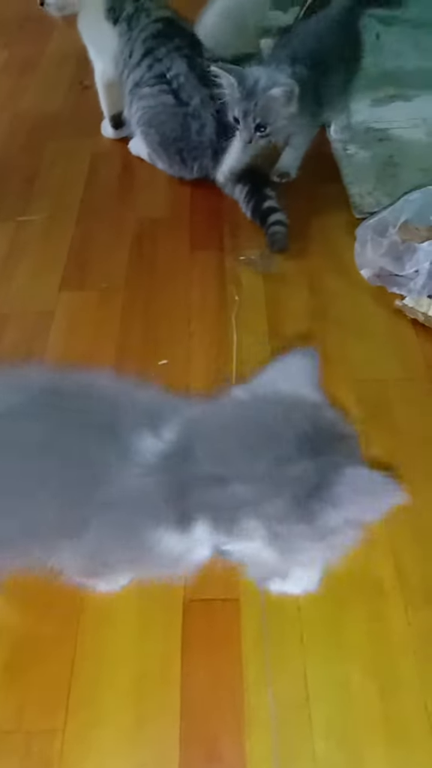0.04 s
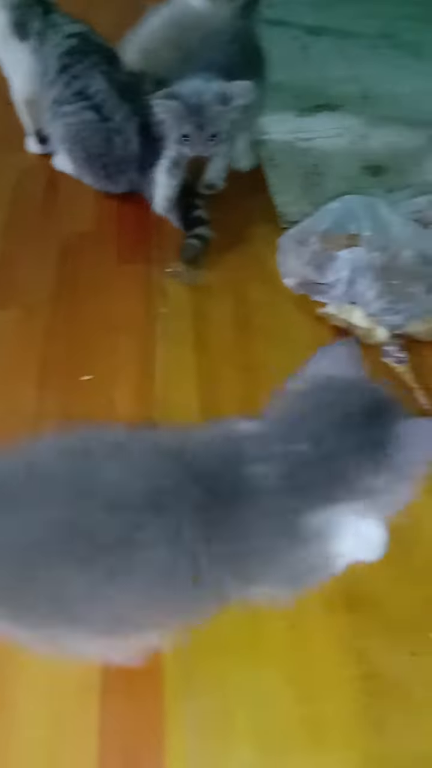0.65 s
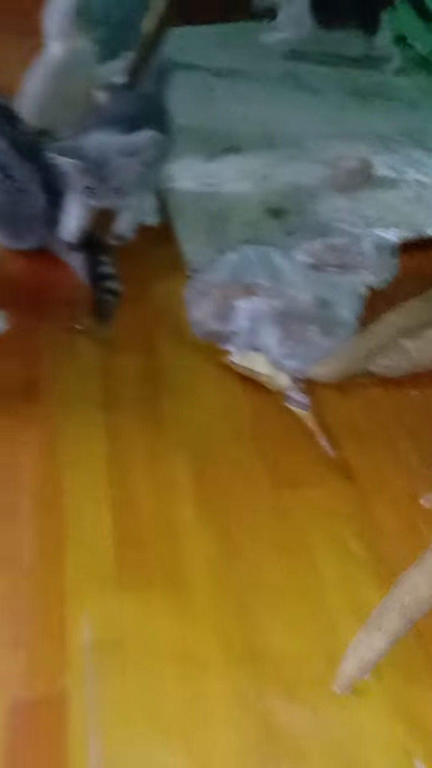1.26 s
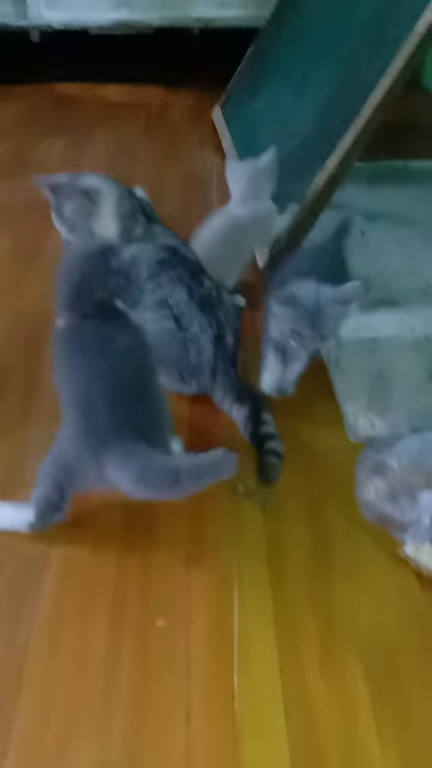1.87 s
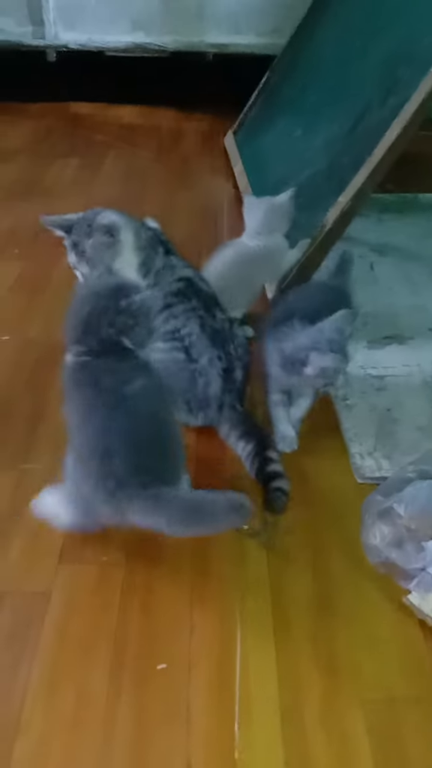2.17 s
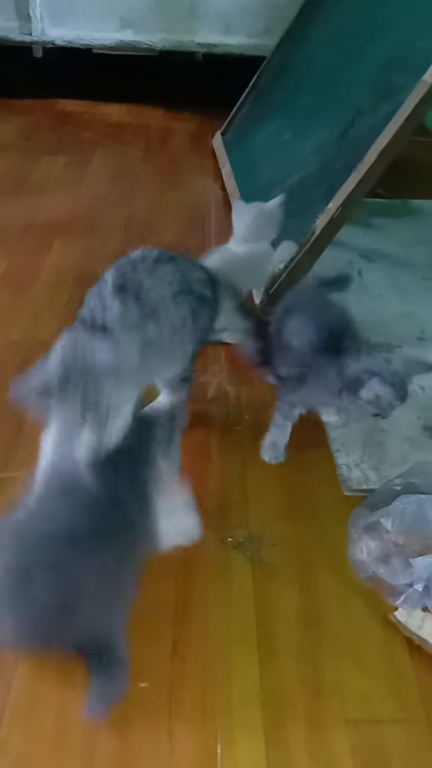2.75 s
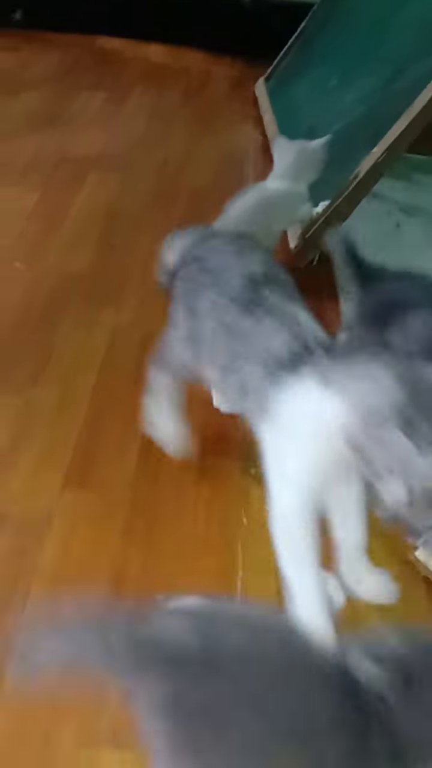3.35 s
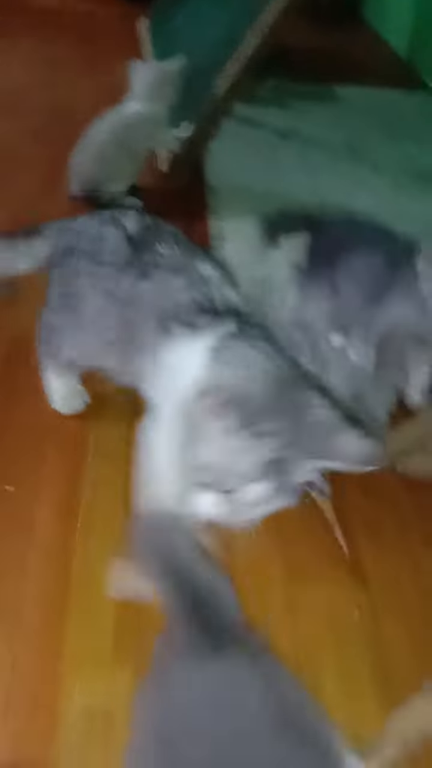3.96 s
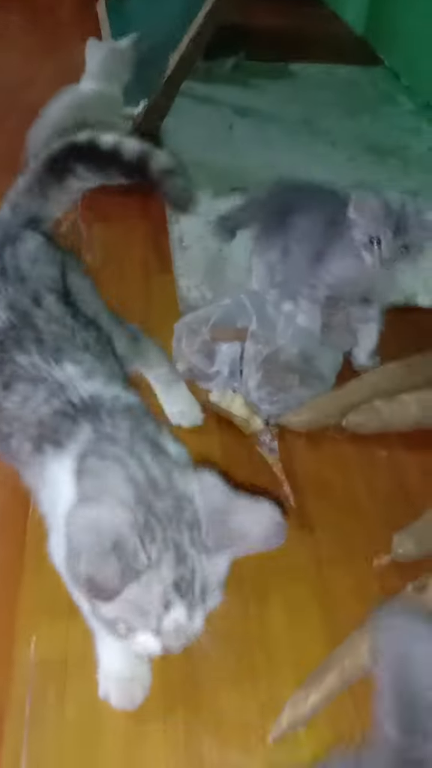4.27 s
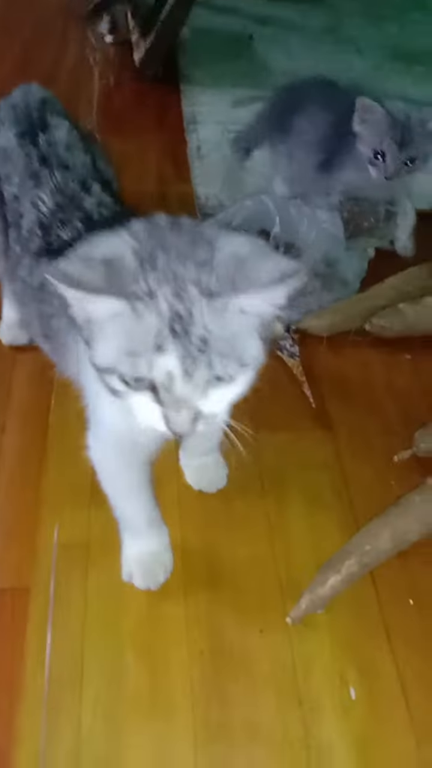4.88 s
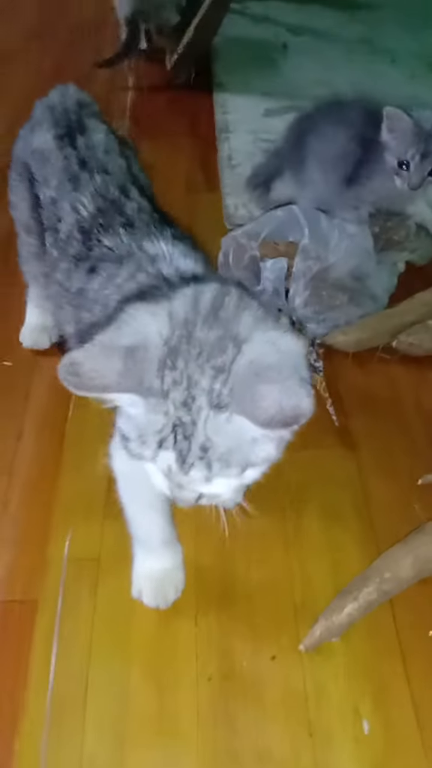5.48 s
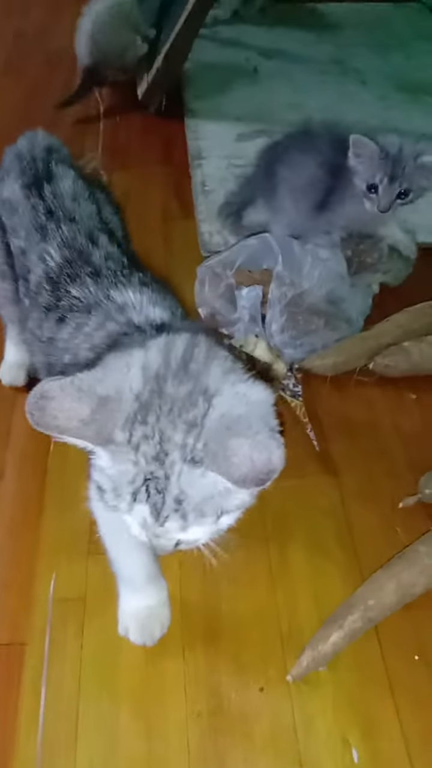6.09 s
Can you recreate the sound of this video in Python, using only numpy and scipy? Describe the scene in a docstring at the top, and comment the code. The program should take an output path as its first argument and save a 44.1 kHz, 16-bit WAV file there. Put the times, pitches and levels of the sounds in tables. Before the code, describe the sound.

Birds sing outside a quiet room, their buzzy chirps echoing in, while kittens play right by the microphone. First comes a short flurry of paw taps and claw clicks on wood, then a plastic bag rustles and one bird gives a harsh rasp. The kittens tussle again with soft thuds, crisp snaps and a small tinkling bell, ending in a hard knock on a floorboard. Gentle sliding and crinkling trail off.

```python
"""Kittens scuffle on a wooden floor close to the microphone, beside a plastic bag. Paws slide, tap and
thud, claws click, the bag crinkles, a small collar bell tinkles, and one hard knock sets the boards
booming. Outside, birds chirp, trill, warble and rasp, their calls blurred by echoes on the way in,
and a faint high hiss rises and falls with their song. One small microphone with noise suppression
hears it all over a quiet room, with a soft rumble of handling at first."""
import sys
import numpy as np
from scipy import signal
from scipy.fft import rfft, irfft
from scipy.io import wavfile
from scipy.ndimage import uniform_filter1d, map_coordinates

SR = 44100
rng = np.random.default_rng(int(sys.argv[2]) if len(sys.argv) > 2 else 0)


def master_out(mix):
    """Clip the mix to full scale and print it as 16-bit PCM to the path in sys.argv[1]."""
    frames = np.transpose(np.atleast_2d(mix))
    ceiling = np.clip(frames, -1, 1)
    pcm = np.round(ceiling * 32767).astype(np.int16)
    wavfile.write(sys.argv[1], SR, pcm)


N = 274595
T = np.arange(N) / SR


# A paw or flank slides over the boards, close to the microphone.
# Each row: time of full strength in seconds, hold in seconds, relative rub and scratch levels in dB.
SLIDES = [(.817, 0.017, -42.5, -53.5), (.868, 0.0039, -48, -46), (.925, 0.049, -63, -63.5),
          (1.295, 0.0094, -44, -63.5), (3.607, 0.16, -44, -48.5), (3.835, 0.038, -52, -48),
          (4.31, 0.073, -55.5, -58.5), (4.44, 0.15, -49, -61), (4.6, 0.075, -51.5, -50.5),
          (4.74, 0.12, -61.5, -61.5), (4.975, 0.13, -62, -55.5), (5.44, 0.044, -54.5, -69),
          (5.772, 0.027, -53.5, -62.5)]
# The tone of pad, fur and claw on wood. Each row: frequency in Hz, relative gain in dB.
RUB_SPECTRUM = [(200, -3), (330, -0.5), (420, 1.5), (520, -8), (600, -3), (800, 4.5), (930, 4.5),
                (1150, 10), (1600, -18)]
SCRATCH_SPECTRUM = [(900, -15), (1400, 9.5), (2000, -4), (3000, 4.5), (4500, -11.5), (6500, -1.5),
                    (9000, -13.5)]
TICK_SPECTRUM = [(2500, -2), (4500, 2), (7500, -7), (10000, -17), (13000, -6), (15500, -15)]

def scuffs():
    """Pads rub the boards, fur scratches over them and claws catch in the grain."""
    rub_gain, scratch_gain = swells(SLIDES, rise_db_per_s=483, sag_db_per_s=33, t60=0.27)
    rub = colour(grains(per_s=1100, spread_db=-3.5), RUB_SPECTRUM) * rub_gain
    scratch = colour(grains(per_s=2800, spread_db=3), SCRATCH_SPECTRUM) * scratch_gain
    ticks = colour(grains(per_s=170, spread_db=3), TICK_SPECTRUM) * scratch_gain
    return from_db(-8) * rub + from_db(3.5) * scratch + from_db(-2.5) * ticks


# Light paws on the floor nearby. Each row: time in seconds, relative level in dB.
PAW_TAPS = [(.803, -43), (.87, -33), (.971, -44.5), (1.3, -47.5), (2.815, -31), (3.114, -40.5),
            (3.437, -40.5), (3.727, -38), (3.868, -30.5), (4.365, -33), (4.473, -35), (4.509, -39.5),
            (4.748, -50.5)]
# The wood under a tap. Each row: frequency in Hz, relative level in dB, time to fall 60 dB in seconds.
TAP_RING = [(505, 0, 0.025), (728, -1.5, 0.042), (908, 11.5, 0.02), (1220, -10.5, 0.016),
            (1280, -27, 0.014)]

def paw_taps():
    """A light paw rings the board briefly, with little bass."""
    return from_db(-9) * low_cut(strike(PAW_TAPS, TAP_RING), order=3, cut_hz=670)


# Hollow shuffles of a paw pushing off.
# Each row: start in seconds, length in seconds, resonance in Hz, level in dB.
PUSH_OFFS = [(0.801, 0.051, 760, -48), (0.822, 0.21, 415, -63), (1.086, 0.07, 590, -64),
             (1.149, 0.043, 1310, -64), (1.239, 0.13, 493, -66.5), (1.777, 0.096, 1270, -70),
             (2.809, 0.071, 600, -55.5), (3.111, 0.054, 437, -62.5), (3.321, 0.093, 796, -56),
             (3.34, .16, 145, -53), (3.426, 0.031, 1385, -55), (2.364, 0.092, 860, -60),
             (3.865, 0.012, 770, -45), (4.174, 0.045, 430, -53), (4.18, 0.053, 930, -49.5),
             (5.187, 0.25, 1440, -69.5), (5.366, 0.18, 624, -71), (5.742, 0.11, 460, -70)]

def shuffles():
    """Stick-slip of a pad excites one broad resonance of the board beneath it."""
    out = np.zeros(N)
    slips = grains(per_s=2000, spread_db=3.5)
    for start, length, hz, db in PUSH_OFFS:
        now = (T >= start) & (T < start + length)
        band = [(hz, 0.35 * hz, 0)]
        board = resonate(resonate(slips[now], band), band)
        out[now] += from_db(db) * rms_one(board * signal.windows.tukey(now.sum()))
    return out


# Low thuds: a soft rumble of microphone handling at first, then kittens landing on the floor.
# Each row: time in seconds, relative level in dB, firmness as a tilt in dB per octave about 100 Hz.
LOW_THUDS = [(0.051, -57, -14), (0.2, -58, -14), (0.288, -59.5, -17), (1.181, -59, -2), (1.225, -55, 0),
             (2.715, -53.5, 6), (2.845, -51.5, 14), (3.355, -52, 3), (3.401, -50, 2), (3.455, -54, 7),
             (3.884, -59.5, 14), (4.174, -38.5, 6), (4.479, -55.5, 8)]
# Their low modes. Each row: frequency in Hz, relative level in dB, time to fall 60 dB in seconds.
THUD_RING = [(81, -16, 0.13), (99, 6, 0.28), (150.5, -4, 0.27), (185, -12, 0.098), (250, -11, 0.037)]

def low_thuds():
    """Dull bumps ring a few low modes; the firmer the bump, the more it stirs the higher ones."""
    out = np.zeros(N)
    for start, level_db, tilt_db in LOW_THUDS:
        modes = [(hz, db + tilt_db * np.log2(hz / 100), t60) for hz, db, t60 in THUD_RING]
        out += strike([(start, level_db)], modes)
    return soften(out, cut_hz=670)


# A board struck hard. Each row: frequency in Hz, relative level in dB, time to fall 60 dB in seconds.
KNOCK_RING = [(470, -15.5, 0.022), (1030, -7, 0.012), (2860, -7, 0.0099), (3080, 0, 0.0064),
              (5300, -23, 0.02), (6570, -24, 0.013), (12800, -27, 0.0035)]

def knocked_board(knock_s=4.171, boom_hz=146, hold_s=0.0517, pinned_t60=0.22):
    """One hard knock: the loose board booms at full strength until a paw pins it, then dies away."""
    knock = strike([(knock_s, -14)], KNOCK_RING)
    age = T - knock_s
    swinging = age > 0.002
    pinned_db = (age > hold_s) * (-18 - 60 * (age - hold_s) / pinned_t60)
    boom_gain = uniform_filter1d(swinging * from_db(-30 + pinned_db), size=260)
    return knock + tone(boom_hz * swinging) * boom_gain


# Claw clicks and snaps of the bag, at close range. Each row: time in seconds, relative level in dB,
# brightness as treble drive minus body drive in dB, decay time constant in seconds.
CLICKS_AND_SNAPS = [(0.721, -45, 28, .0015), (.763, -23.5, 16, 0.0017), (.767, -28, 16, 0.0023),
                    (.823, -24, 4, .0005), (.836, -26, -9, .0005), (.866, -23, 2, .0006),
                    (.875, -14.5, -9, .0005), (.894, -12, -3, 0.00042), (.934, -5.5, 1.5, .0006),
                    (1.132, -29, 22, .0015), (1.363, -25, 20.5, 0.0019), (3.256, -7.5, 2, .0014),
                    (3.259, -12.5, 5, .0015), (3.278, -16, 15, 0.00098), (3.284, -21, 31, 0.0016),
                    (3.297, -19, 27, .0015), (3.378, -19, 14, 0.0011), (3.607, -19, 6, .0006),
                    (3.658, -22, 6, .0006), (3.73, -13, -7, 0.00051), (3.82, -13, 8, 0.00099),
                    (3.875, -15, 10, .0007), (3.901, -22, 13, .0008), (3.9296, -3.5, 15, 0.00074),
                    (4.045, -29.5, 17, .001), (4.171, -7.5, -3, .0012), (4.333, -21, 7, .0018),
                    (4.349, -17, 1, 0.0014), (4.792, -29, 20, 0.00088)]
# The resonances of a snap. Each row: centre in Hz, width in Hz, relative gain in dB.
SNAP_BODY_BANDS = [(3240, 1450, -10.5), (4380, 500, -5), (5200, 760, -7)]
SNAP_TREBLE_BANDS = [(6900, 630, 3), (7240, 1800, -12.5), (13000, 2500, -13.5)]

def snaps():
    """A claw clicks or the plastic snaps: a burst that dies within a few milliseconds."""
    bursts = np.zeros((2, N))
    for start, db, bright_db, decay_s in CLICKS_AND_SNAPS:
        now = slice(*np.searchsorted(T, [start, start + 10 * decay_s]))
        gains = from_db([[db - bright_db / 2], [db + bright_db / 2]])
        bursts[:, now] += gains * np.exp((start - T[now]) / decay_s)
    body_noise, treble_noise = bursts * rng.choice([-1, 1], (2, N))
    body = resonate(body_noise, SNAP_BODY_BANDS)
    treble = resonate(treble_noise, SNAP_TREBLE_BANDS)
    return from_db(-1.5) * body + from_db(-13) * treble


# The bag beside the kittens is nudged and rustles.
# Each row: time of full strength in seconds, hold in seconds, relative crinkle and fizz levels in dB.
BAG_NUDGES = [(.83, 0.074, -57, -51), (.925, 0.0046, -48.5, -68), (1.095, 0.0075, -51, -56.5),
              (1.18, 0.16, -51, -71), (1.365, 0.053, -49, -59.5), (1.595, 0.037, -52.5, -63.5),
              (2.03, 0.079, -47, -79), (2.165, 0.049, -49.5, -70.5), (2.3, 0.26, -50, -78),
              (2.6, 0.2, -49, -65), (2.85, 0.0054, -54, -50), (3.085, 0.025, -56, -61.5),
              (3.27, 0.022, -43.5, -52), (3.35, 0.08, -44.5, -65), (3.62, 0.11, -49, -49),
              (3.825, 0.039, -49, -46), (3.905, 0.027, -47, -69), (4.32, 0.025, -41.5, -49),
              (4.44, 0.2, -67, -60), (4.61, 0.042, -75, -52), (4.8, 0.035, -49.5, -59),
              (4.995, 0.071, -50, -60), (5.27, 0.21, -72, -71), (5.757, 0.011, -68, -60),
              (6.07, 0.2, -60.5, -77)]
# The tone of the plastic. Each row: frequency in Hz, relative gain in dB.
CRINKLE_SPECTRUM = [(2700, -15), (3600, 8), (4500, 5), (5600, 4), (6150, -4.5), (6700, -6.5), (7300, -10),
                    (8000, -12.5), (9000, -31), (10500, -62.5)]
FIZZ_SPECTRUM = [(5000, -12), (8000, 6), (9500, -11.5), (11200, -10.5), (13000, 0.5), (15500, -9)]

def plastic_bag():
    """Thin plastic crinkles in clumps of tiny buckles."""
    crinkle_gain, fizz_gain = swells(BAG_NUDGES, rise_db_per_s=491, sag_db_per_s=11.5, t60=0.3)
    clumps = from_db(3.2 * drift(per_s=70))
    crinkle = colour(grains(per_s=3700, spread_db=0.5), CRINKLE_SPECTRUM) * crinkle_gain
    fizz = colour(grains(per_s=1100, spread_db=3.8), FIZZ_SPECTRUM) * fizz_gain
    return clumps * (from_db(5.5) * crinkle + fizz)


# A small bell on a kitten's collar, close by.
# Each row: time in seconds, relative levels of the low and high ring in dB, favoured frequency in Hz.
BELL_STRIKES = [(1.1, -52, -36.5, 10000), (1.15, -49, -37, 10350), (1.24, -49, -45, 9950),
                (1.305, -49, -40.5, 9800), (1.4, -50, -41.5, 10100), (3.108, -51, -44, 10350),
                (3.256, -30, -31, 9950), (3.259, -44, -30, 10350), (3.277, -19, -29, 10200),
                (3.298, -26.5, -24, 10350), (3.422, -48, -35, 10460), (3.873, -39, -28, 10400),
                (3.9, -36, -30, 9950), (3.93, -32.5, -28, 10300), (4.35, -42, -42, 10350)]
# The shell's modes. Each row: frequency in Hz, relative level in dB, time to fall 60 dB in seconds.
BELL_LOW_RING = [(4060, -5, 0.13), (4070, -7.5, 0.041)]
BELL_HIGH_RING = [(9700, -23, 0.27), (10000, -19.5, 0.18), (10110, -18, .18), (10350, -17.5, 0.16),
                  (10500, -21.5, .15)]

def collar_bell(focus_db_per_hz=0.022):
    """The pellet hits a new spot on the shell each time, favouring another partial, and rebounds."""
    out = strike([(start, low_db) for start, low_db, _, _ in BELL_STRIKES], BELL_LOW_RING)
    for start, _, high_db, favoured_hz in BELL_STRIKES:
        modes = [(hz, db - focus_db_per_hz * abs(hz - favoured_hz), t60)
                 for hz, db, t60 in BELL_HIGH_RING]
        rebound = (start + rng.uniform(0.015, 0.07), high_db - 8)
        out += strike([(start, high_db), rebound], modes)
    return out


# A songbird outside, one of the two nearer birds, repeats one phrase. Each row: start in seconds,
# time stretch as a ratio, relative levels of the phrase and of its loud syllable in dB.
SONG_PHRASES = [(1.035, 1, -40, -30.5), (1.959, 1.07, -39.5, -33.5), (3.333, 1, -40, -29),
                (4.269, 1.02, -40.5, -34), (6.029, 1.15, -42, -34)]
# Its other syllables, buzzes on two voices and a falling whistle. Each row: offset and length in
# seconds, start pitch, end pitch and buzz depth in Hz, level within the phrase in dB.
SONG_SYLLABLES = [(0, 0.1, 5360, 5394, 172, -9), (0.033, 0.0694, 4310, 4123, 405, -5.5),
                  (0.117, 0.11, 5368, 5363, 252, -2.5), (.19, 0.0742, 4310, 4088, 361, 1.5),
                  (0.255, .11, 5420, 5260, 230, -6.5), (0.298, 0.0587, 4370, 4110, 342, 1.5),
                  (0.384, 0.066, 4178, 3942, 391, 2.5), (0.406, 0.061, 5360, 5260, 200, -16),
                  (.47, .075, 4200, 3980, 360, -1), (0.548, .105, 5127, 5202, 152, -2),
                  (0.649, 0.084, 5126, 4720, 381, -1.5), (0.724, .085, 4565, 4255, 325, 1)]

def songbird():
    """A phrase of separate buzzy syllables, pitched a little differently each time."""
    rows = []
    for start, stretch, level_db, loud_db in SONG_PHRASES:
        loud_syllable = (0.108, 0.0552, 4080, 4180, 390, loud_db - level_db)
        for offset, length, from_hz, to_hz, depth_hz, db in [loud_syllable] + SONG_SYLLABLES:
            shift_hz = 50 * rng.standard_normal()
            rows.append((start + stretch * offset, stretch * length,
                         from_hz + shift_hz, to_hz + shift_hz, depth_hz, level_db + db))
    return low_cut(notes(rows, buzz_per_s=72, rough=0.449), order=7, cut_hz=2950)


# Harsh calls from the other nearer bird. Each row: time of full strength in seconds, hold in seconds,
# relative levels of the low formant and of the upper formants in dB.
RASP_CALLS = [(2.372, 0.012, -36.5, -75), (2.697, 0.34, -38.5, -37)]
# The resonances of its throat. Each row: centre in Hz, width in Hz, relative gain in dB.
THROAT_LOW = [(916, 58, -23.5), (1616, 227, 4), (1983, 77, -28.5)]
THROAT_MID = [(1994, 200, 0)]
THROAT_HIGH = [(2440, 460, 14.5), (2780, 480, 17.5), (3800, 1200, 13.5)]
# The long rasp's shrill bands sink, then flick up at the end. Each row: start and length in seconds,
# start pitch, end pitch and buzz depth in Hz, relative level in dB.
SHRILL_BANDS = [(2.675, 0.082, 3100, 3000, 193, -37), (2.685, 0.069, 2300, 2350, 147, -40),
                (2.75, .27, 2850, 2700, 138, -44.5), (2.7, .34, 2030, 1950, 108.7, -42.5),
                (2.97, .08, 2200, 3300, 130, -44)]

def rasping_bird():
    """Irregular pulses ring narrow throat resonances, with shrill tones on the long call."""
    pulses = grains(per_s=7000, spread_db=2)
    mid_pulses = grains(per_s=8100, spread_db=2)
    low = rms_one(resonate(resonate(pulses, THROAT_LOW), [(1410, 1100, 0)]))
    mid = rms_one(resonate(resonate(mid_pulses, THROAT_MID), THROAT_MID))
    high = rms_one(resonate(resonate(pulses, THROAT_HIGH), [(3530, 1800, 0)]))
    low_gain, upper_gain = swells(RASP_CALLS, rise_db_per_s=761, sag_db_per_s=5.5, t60=0.18)
    upper = from_db(-4.5) * mid + from_db(1.5) * high
    rasp = from_db(-1.5) * low * low_gain + upper * upper_gain
    return soften(rasp, cut_hz=4300) + notes(SHRILL_BANDS, buzz_per_s=74, rough=0.868)


# Single echoing chirps outside, including extra syllables within the songbird's phrases.
# Each row: start and length in seconds, start pitch, end pitch and buzz depth in Hz, level in dB.
SINGLE_CHIRPS = [(.045, 0.041, 4280, 4140, 340, -51.5), (.046, 0.031, 3100, 2990, 130, -56),
                 (.25, 0.0526, 3855, 3547, 532, -47.5), (.42, 0.062, 3660, 3522, 265, -50.5),
                 (.575, 0.055, 4110, 3695, 573, -53), (1.09, 0.06, 3436, 3450, 110, -49),
                 (1.43, 0.033, 3830, 3690, 200, -49.5), (1.745, 0.044, 4550, 4370, 250, -43.5),
                 (1.77, 0.068, 4180, 3650, 388, -39.5), (1.8, 0.07, 3380, 3180, 240, -48.5),
                 (1.93, 0.063, 4150, 3990, 330, -50.5), (2.28, 0.037, 4400, 4200, 220, -38.5),
                 (2.38, 0.094, 3920, 3830, 390, -41), (2.53, 0.12, 4255, 4460, 400, -41),
                 (2.69, 0.058, 4530, 4170, 390, -37.5), (2.97, .05, 4600, 4520, 130, -45),
                 (3.08, 0.04, 5000, 4880, 100, -51), (3.11, .05, 4450, 4310, 219.6, -47),
                 (3.175, 0.063, 3750, 3600, 199, -49.5), (3.185, 0.055, 2910, 2850, 110, -51.5),
                 (3.2, 0.063, 4570, 4490, 150, -43.5), (3.645, 0.041, 4500, 4380, 200, -41),
                 (4.08, 0.062, 3910, 3390, 300, -45), (4.157, 0.05, 4400, 3940, 397, -39.5),
                 (4.195, 0.112, 3274, 3080, 240, -53.5), (4.345, 0.034, 4150, 3870, 300, -36),
                 (4.82, 0.16, 4230, 4550, 324, -43), (5.215, 0.064, 3480, 3600, 140, -51.5),
                 (5.265, 0.055, 3080, 2950, 240, -55), (5.265, 0.067, 4390, 4550, 230, -48),
                 (5.447, 0.053, 4550, 4460, 270, -48), (5.626, 0.046, 3560, 3500, 120, -57.5),
                 (5.642, 0.073, 4540, 4610, 224, -50), (5.785, 0.061, 4100, 3910, 210, -52.5),
                 (5.825, 0.025, 3660, 3610, 217, -50.5), (5.983, 0.044, 4200, 4085, 260, -46)]
# A small bird out there repeats a thin two-step note.
# Each row: start in seconds, level in dB, delay of the upper step in seconds, its level in dB.
TWO_STEP_PEEPS = [(.026, -56.5, 0.068, -59.5), (.29, -58, 0.07, -65), (.557, -57, 0.08, -61),
                  (1.849, -48.5, 0.078, -57), (3.101, -49, 0.035, -73), (3.19, -51.5, 0.027, -58),
                  (4.199, -52.5, 0.089, -53), (5.159, -52, 0.028, -52), (5.41, -52, 0.034, -67),
                  (5.656, -58, 0.017, -60), (5.913, -56, .08, -65)]
# Faint thin steady tones, one low and two very high.
# Each row: start and length in seconds, pitch in Hz, level in dB.
THIN_TONES = [(5.52, .2, 1820, -76), (5.273, 0.23, 7100, -62.5), (5.74, .2, 6900, -66.5)]

def chirps(lower_hz=5320, upper_hz=5830):
    """Quick rough chirps, with a thin two-step note above them and a few faint steady tones."""
    lower = [(start, 0.09, lower_hz, lower_hz, 138, db) for start, db, _, _ in TWO_STEP_PEEPS]
    upper = [(start + delay, 0.079, upper_hz, upper_hz, 72, db)
             for start, _, delay, db in TWO_STEP_PEEPS]
    thin = [(start, length, hz, hz, 72, db) for start, length, hz, db in THIN_TONES]
    return notes(SINGLE_CHIRPS + lower + upper + thin, buzz_per_s=110, rough=0.378)


# A distant warbler repeats one call.
# Each row: start in seconds, time stretch as a ratio, relative level in dB.
WARBLER_CALLS = [(0, 1, -54.5), (2.975, 1.04, -49.5)]
# The call hops between high and low notes.
# Each row: offset and length in seconds, pitch and waver in Hz, level within the call in dB.
WARBLER_NOTES = [(0.01, .06, 945, 22, 1), (.017, 0.06, 1259, 20, 1.5), (.105, 0.09, 1205, 49, 1.5),
                 (0.174, .085, 933, 35, 1.5), (.25, 0.073, 1131, 80, -2.5), (0.304, 0.09, 933, 36, -3),
                 (0.328, 0.061, 1088, 33, -2), (0.438, 0.082, 916.5, 25, -2.5),
                 (0.447, 0.037, 1127, 36, -3.5), (.49, 0.05, 1219, 29, 2), (.565, .045, 1182, 52, -8)]

def warbler():
    """A low, broken call of short wavering notes, held within the narrow band of the throat."""
    rows = [(start + stretch * offset, stretch * length, hz, hz, waver_hz, level_db + db)
            for start, stretch, level_db in WARBLER_CALLS
            for offset, length, hz, waver_hz, db in WARBLER_NOTES]
    throat = signal.butter(3, (873, 1390), "band", fs=SR, output="sos")
    return signal.sosfilt(throat, notes(rows, buzz_per_s=45, rough=0.9))


# A faint high hiss that rises and falls with the birdsong.
# Each row: time in seconds, relative level in dB.
HISS_LEVELS = [(0.74, -93), (0.98, -61), (1.24, -52), (1.42, -55.5), (1.52, -61), (1.66, -55.5), (1.9, -61),
               (2.17, -60), (2.62, -54.5), (2.9, -57), (3.05, -63), (3.2, -62), (3.43, -48.5), (3.8, -57.5),
               (4.13, -53.5), (4.48, -57), (4.97, -50.5), (5.09, -57), (5.2, -60.5), (5.5, -68),
               (5.61, -89), (5.72, -60.5), (5.9, -73), (6.0, -65.5), (6.2, -56.5)]
# Its tone. Each row: frequency in Hz, relative gain in dB.
HISS_SPECTRUM = [(3000, -18.5), (4500, 3.5), (5600, -4), (6150, -7.5), (6700, -7), (7900, -13.5),
                 (9000, -43), (10500, -39)]

def high_hiss():
    """A fine, grainy hiss that swells and fades."""
    gain = from_db(6 + np.interp(T, *np.transpose(HISS_LEVELS), left=-np.inf))
    return colour(grains(per_s=6000, spread_db=5), HISS_SPECTRUM) * gain


# The quiet room around the microphone. Each row: frequency in Hz, relative gain in dB.
ROOM_SPECTRUM = [(25, 3.5), (55, -12), (95, 4.5), (160, -4.5), (250, -8), (400, -14), (800, -21.5),
                 (1400, -22), (2500, -25), (5000, -16), (6500, -30.5), (7800, -12), (9500, -53.5),
                 (15000, -35)]

def room_tone():
    """A steady low rumble with a faint hiss."""
    return from_db(-65.5) * colour(rng.standard_normal(N), ROOM_SPECTRUM)


def from_db(db):
    """Decibels to gain."""
    return 10 ** (np.asarray(db) / 20)


def rms_one(x):
    """Scale to unit power."""
    return x / np.sqrt(np.mean(x ** 2) + 1e-20)


def drift(per_s):
    """Smooth random wander of spread 1."""
    knots = rng.standard_normal(4000)
    return rms_one(map_coordinates(knots, [T * per_s], order=2, mode="wrap"))


def grains(per_s, spread_db):
    """Tiny impulses at random times and of uneven size."""
    sizes = from_db(spread_db * np.minimum(rng.exponential(1, N), 4))
    signs = rng.choice([-1, 1], N)
    return sizes * signs * (rng.random(N) < per_s / SR)


def swells(events, rise_db_per_s, sag_db_per_s, t60):
    """One gain curve per level column, for events that swell, sag while they hold and die away."""
    t = T[::20]
    full_s, hold_s, *levels_db = np.transpose(events)[:, :, None]
    age = t - full_s
    fall_db = np.maximum(-rise_db_per_s * age, sag_db_per_s * age)
    fall_db += 60 * np.maximum(age - hold_s, 0) / t60
    return [np.interp(T, t, np.linalg.norm(from_db(db - fall_db), axis=0)) for db in levels_db]


def strike(hits, modes):
    """Each hit rings every mode as a decaying sine, its strength varying by about 1 dB."""
    times, hit_db = np.transpose(hits)
    chance_db = rng.standard_normal((len(hits), len(modes)))
    out = np.zeros(N)
    for k, (hz, db, t60) in enumerate(modes):
        impulses = np.zeros(N)
        impulses[(times * SR).astype(int)] = from_db(hit_db + db + chance_db[:, k])
        radius, angle = np.exp(-np.log(1000) / (t60 * SR)), 2 * np.pi * hz / SR
        feedback = [1, -2 * radius * np.cos(angle), radius ** 2]
        out += signal.lfilter([0, np.sin(angle)], feedback, impulses + 1e-18)
    return out


def tone(hz):
    """A pure tone of unit power that follows a pitch curve."""
    return np.sqrt(2) * np.sin(2 * np.pi * np.cumsum(hz) / SR)


def notes(rows, buzz_per_s, rough, attack_s=0.0041, release_s=0.0094):
    """Each note glides between two pitches while a quick, uneven buzz sweeps it up and down."""
    buzz_phase = 2 * np.pi * np.cumsum(buzz_per_s * (1 + 0.08 * drift(per_s=15))) / SR
    buzz = signal.sawtooth(buzz_phase, 0.5) + rough * drift(per_s=450)
    out = np.zeros(N)
    for start, length, from_hz, to_hz, depth_hz, db in rows:
        now = slice(*np.searchsorted(T, [start, start + length]))
        age = T[now] - start
        gain = np.clip(np.minimum(age / attack_s, (length - age) / release_s), 0, 1)
        glide_hz = from_hz + (to_hz - from_hz) * age / length
        out[now] += from_db(db) * gain * tone(glide_hz + depth_hz * buzz[now])
    return out


def colour(x, spectrum):
    """Pass a sound through a causal filter with the given (Hz, dB) response; unit power."""
    hz, db = np.transpose(spectrum)
    log_hz = np.log(np.fft.rfftfreq(8192, 1 / SR) + 1)
    outside = np.maximum(np.log(hz[0]) - log_hz, 0) + np.maximum(log_hz - np.log(hz[-1]), 0)
    gain_db = np.interp(log_hz, np.log(hz), db) - 40 * np.minimum(outside, 1)
    cepstrum = irfft(np.log(from_db(gain_db)))
    cepstrum[len(cepstrum) // 2:] = 0   # minimum phase
    response = irfft(np.exp(2 * rfft(cepstrum)))
    return rms_one(signal.fftconvolve(x, response)[:N])


def resonate(x, bands):
    """Parallel band-pass resonances, each given as centre in Hz, width in Hz, gain in dB."""
    return sum(from_db(db) * signal.lfilter(*signal.iirpeak(hz, hz / width, fs=SR), x + 1e-18)
               for hz, width, db in bands)


def soften(x, cut_hz):
    """Take the treble edge off a sound, as a soft paw or throat does."""
    return signal.sosfilt(signal.butter(2, cut_hz, fs=SR, output="sos"), x)


def low_cut(x, order, cut_hz):
    """Small sources and microphones lose what lies below their range."""
    return signal.sosfilt(signal.butter(order, cut_hz, "high", fs=SR, output="sos"), x)


def echoes(x, t60, renewal_s=0.16):
    """A diffuse tail of reflections with unit energy, whose pattern changes as the microphone moves."""
    hop = int(renewal_s * SR)
    fade = np.exp(-np.log(1000) * T[:SR // 2] / t60)
    window = signal.windows.cosine(2 * hop)
    padded = np.pad(x, (hop, 2 * hop))
    out = np.zeros(N + 2 * SR)
    for i in range(0, N + hop, hop):
        tail = rng.standard_normal(len(fade)) * fade
        wet = signal.fftconvolve(padded[i:i + 2 * hop] * window, tail / np.linalg.norm(tail))
        out[i:i + len(wet)] += wet
    return out[hop:hop + N]


def suppress_noise(x, strength, memory_s, deepest_db):
    """Bands that have lately been weaker than their neighbours are turned down."""
    size, hop = 512, 128
    spectra = signal.stft(x, nperseg=size, noverlap=size - hop)[2]
    keep = np.exp(-hop / (memory_s * SR))
    power = signal.lfilter([1 - keep], [1, -keep], np.abs(spectra) ** 2 + 1e-18)
    neighbours = signal.convolve(power, np.ones((1, 9, 1)) / 9, "same", "direct")
    gain_db = np.clip(strength * 10 * np.log10(power / neighbours), -deepest_db, 1)
    return signal.istft(spectra * from_db(gain_db), nperseg=size, noverlap=size - hop)[1][:, :N]


def scene():
    """Kittens close to the microphone and nearly dry; birds outside, heard mostly by reflection."""
    direct = scuffs() + plastic_bag() + high_hiss() + snaps() + paw_taps() + shuffles() + low_thuds()
    direct += knocked_board() + collar_bell()
    near_birds = songbird() + rasping_bird()
    echo_only = chirps() + warbler()
    birds = from_db(-12) * near_birds + echoes(near_birds, t60=0.36) + echoes(echo_only, t60=0.29)
    background = birds + room_tone()
    return (direct + from_db(-8.5) * echoes(direct, t60=0.2) + background)[None]


def record(dry):
    """The small microphone drops the deep bass; noise is suppressed and the top is cut steeply."""
    heard = low_cut(dry, order=3, cut_hz=47)
    cleaned = suppress_noise(heard, strength=0.9, memory_s=0.08, deepest_db=9)
    top_cut = signal.ellip(10, 0.1, 80, 15900, fs=SR, output="sos")
    return signal.sosfilt(top_cut, cleaned)


dry = scene()
out = record(dry)
master_out(out)
```